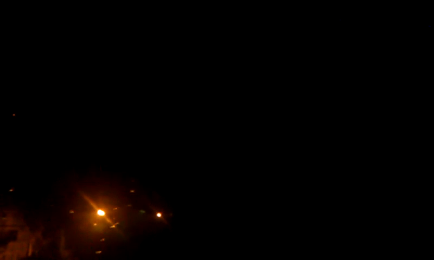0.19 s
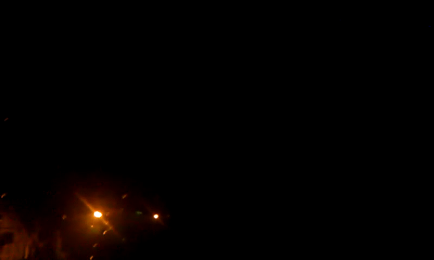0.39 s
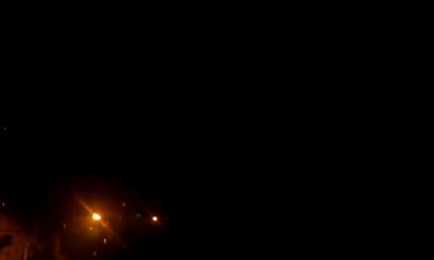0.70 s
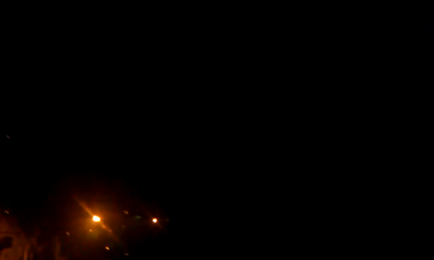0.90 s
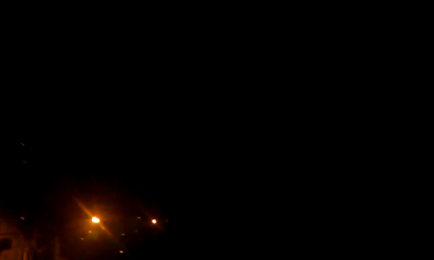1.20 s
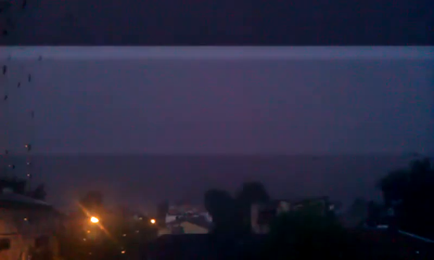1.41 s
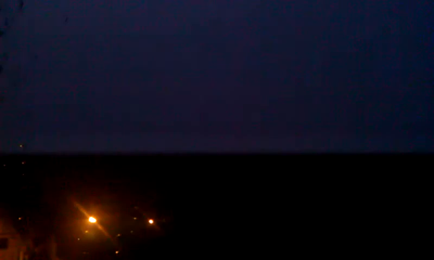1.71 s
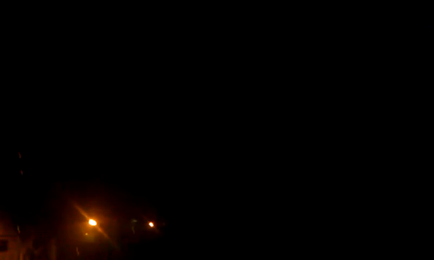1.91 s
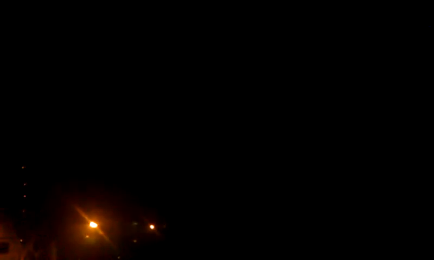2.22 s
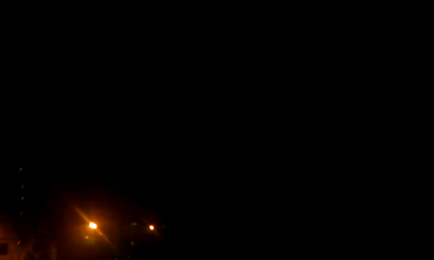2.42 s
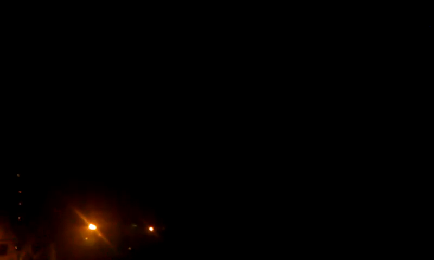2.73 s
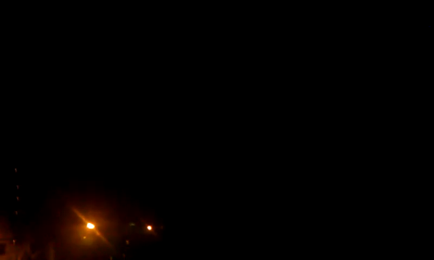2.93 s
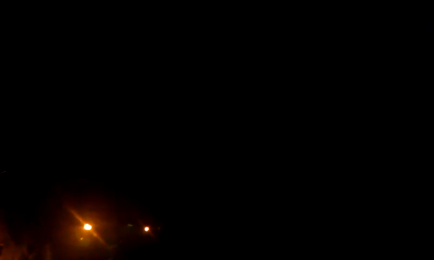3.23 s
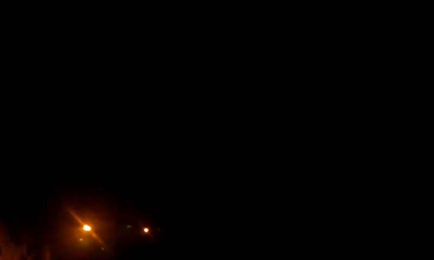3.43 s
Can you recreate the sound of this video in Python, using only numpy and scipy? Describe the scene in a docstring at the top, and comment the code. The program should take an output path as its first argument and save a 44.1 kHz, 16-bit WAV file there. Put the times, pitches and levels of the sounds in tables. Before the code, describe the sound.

Thunder right overhead rips and slams, overloading a simple microphone, strikes again, then fades in lumpy rolls. Soft rain hisses behind it, with a near cricket chirping over a faint far trill, outdoors at night.

```python
"""Close thunder booms at once and rolls on over a wet town at night, heard from a balcony.
The roll is a dense train of random clicks (small shock fronts) that ring the balcony's low resonances.
Short swelling tones add single booms; brief rings with spits of noise add cracks that overload the microphone.
Steady rain, made of clicks and noise, hisses behind it. High up, gliding tones chirp like a near cricket
over a fuzzy trill of farther ones."""
import sys
import numpy as np
from scipy import signal
from scipy.io import wavfile
from scipy.ndimage import uniform_filter1d

SR = 44100
rng = np.random.default_rng(int(sys.argv[2]) if len(sys.argv) > 2 else 0)


def generate_wav(sig):
    """Save sig (samples, or channels by samples) to the path in sys.argv[1] as 16-bit PCM at SR."""
    pcm = np.round(np.clip(np.atleast_2d(sig).T, -1, 1) * 32767).astype(np.int16)
    wavfile.write(sys.argv[1], SR, pcm)


N = 158760  # length in samples: 3.6 s


def amp(db):
    """Turn decibels into a plain multiplier."""
    return 10 ** (np.asarray(db) / 20)


def evened(x):
    """Scale a sound to an average (RMS) strength of 1."""
    return x / np.sqrt(np.mean(x ** 2) + 1e-20)


def curve(rows, axis):
    """Draw one column of a time table as straight lines, with a value at every sample."""
    rows = np.array(rows)
    return np.interp(np.arange(N) / SR, rows[:, 0], rows[:, axis])


def colour(x, points):
    """Filter a sound to follow a spectrum table, with the least possible delay (minimum phase)."""
    point_hz, point_db = np.transpose(points)
    hz = np.abs(np.fft.fftfreq(8192, 1 / SR))
    gain_db = np.interp(np.log(hz + 1), np.log(point_hz + 1), point_db)
    log_gain = gain_db * np.log(10) / 20
    # the Hilbert transform finds the phase that belongs to this gain
    response = np.exp(np.conj(signal.hilbert(log_gain)))
    taps = np.fft.ifft(response).real[:4096]
    return signal.oaconvolve(x, taps)[:N]


def resonate(x, hz, width_hz):
    """Ring at one pitch, with gain 1 there; a narrower resonance rings longer."""
    return signal.lfilter(*signal.iirpeak(hz, hz / width_hz, SR), x)


def clicks(per_s, spread_db):
    """Scatter random clicks that push either way; a few are large."""
    chance = rng.random(N)
    sign = rng.choice([-1., 1.], N)
    size = np.minimum(rng.exponential(1, N), 5)
    return (chance < per_s / SR) * sign * amp(spread_db * size)


def add(mix, start_s, sound):
    """Add a short sound into the mix, cut off at the end of the scene."""
    part = mix[round(start_s * SR):][:len(sound)]
    part += sound[:len(part)]


def roll():
    """Thunder arrives as many small shock fronts, in five layers; all but the top one ring the balcony."""
    # level of the four ringing layers over time: time_s, deep_db, bass_db, body_db, upper_db
    layer_levels = [(0.0, -33.5, -25, -35.5, -23.5), (0.06, -21, -38, -27, -22),
                    (0.11, -33.5, -26, -28.5, -23.5), (0.15, -28, -24, -20, -20),
                    (0.18, -18, -15, -21, -19), (0.205, -19, -10.5, -13.5, -12.5),
                    (0.228, -19, -14.5, -20.5, -16.5), (0.26, -19, -4.5, -10, -11.5),
                    (0.29, -21, -18, -18, -18.5), (0.32, -20, -19.5, -18.5, -17.5),
                    (0.35, -21, -11.5, -17.5, -17), (0.43, -24, -26.5, -23.5, -22.5),
                    (0.51, -29, -16.5, -17.5, -21.5), (0.55, -31, -16.5, -27.5, -22.5),
                    (0.59, -38, -22, -19, -20), (0.63, -27.5, -27.5, -22, -23),
                    (0.68, -27, -23, -25.5, -25), (0.73, -45, -24.5, -21.5, -21),
                    (0.76, -23, -18, -23.5, -24), (0.82, -20, -27, -17.5, -23),
                    (0.85, -25, -15.5, -13.5, -20.5), (0.88, -24, -17, -21, -19.5),
                    (0.91, -22, -13.5, -22, -23), (0.94, -30, -14, -19.5, -21),
                    (0.97, -38, -17.5, -20.5, -24.5), (1.04, -24.5, -23.5, -22, -26),
                    (1.07, -40, -23.5, -19.5, -25.5), (1.16, -37.5, -33.5, -30.5, -30),
                    (1.26, -52, -34, -37.5, -36), (1.29, -33, -30, -28, -29), (1.32, -33, -33, -30, -32),
                    (1.35, -33, -23, -28, -25.5), (1.39, -32, -24, -27.5, -33),
                    (1.47, -35, -33, -34, -33.5), (1.56, -37, -31.5, -32, -34), (1.6, -37, -27, -27.5, -33),
                    (1.65, -32, -38, -28, -31.5), (1.7, -35, -30.5, -27, -31.5),
                    (1.76, -30, -33, -25.5, -33.5), (1.78, -35, -38, -31, -32),
                    (1.815, -40, -33, -29, -33.5), (1.83, -41, -31, -22.5, -29.5),
                    (1.87, -34, -34, -32, -35), (1.93, -38, -47, -34.5, -36.5),
                    (1.98, -53, -31, -34.5, -37), (2.01, -31, -32, -35, -34.5),
                    (2.15, -45, -32.5, -38, -37.5), (2.19, -33, -46, -32.5, -38),
                    (2.28, -50, -35, -39.5, -39), (2.33, -46, -35, -36, -41), (2.35, -39, -34, -30, -33),
                    (2.41, -41, -32, -35, -36.5), (2.47, -46, -39, -30.5, -36.5),
                    (2.49, -28.5, -33, -27.5, -34.5), (2.52, -39, -34, -33, -34.5),
                    (2.55, -31, -32, -27.5, -35.5), (2.65, -46, -32.5, -29.5, -38),
                    (2.67, -42, -43, -37, -41), (2.76, -52, -39, -37.5, -40.5),
                    (2.83, -48, -43, -37, -41.5), (2.87, -46, -42, -41, -38), (2.94, -45, -46, -36, -40.5),
                    (3.01, -46, -46, -38.5, -41.5), (3.07, -64, -47, -37, -42),
                    (3.1, -47, -34.5, -34, -38.5), (3.18, -45, -36, -33.5, -41),
                    (3.26, -52, -45, -40.5, -45.5), (3.34, -46, -41, -42.5, -47.5),
                    (3.38, -44, -43, -44, -41), (3.45, -51, -44, -42, -42), (3.6, -43, -45.5, -38, -49.5)]
    # level of the top layer, the sizzle of the nearest fronts: time_s, level_db
    sizzle_level = [(0, -40.5), (.03, -37), (.16, -37.5), (.19, -24), (.22, -30), (.25, -28), (.31, -30.5),
                    (.36, -30), (.45, -37.5), (.65, -40.5), (.82, -38), (.86, -33.5), (.97, -39),
                    (1.15, -48.5), (1.26, -51), (1.3, -46), (1.5, -51.5), (2.5, -56), (3.6, -56)]
    # spectrum of each layer, from deep to sizzle: pitch_hz, gain_db
    deep = [(20, -37), (45, -14), (75, -8.5), (100, -5.5), (120, -12), (150, -23), (16000, -90.5)]
    bass = [(20, -84.5), (95, -32.5), (130, -2.5), (200, -0.5), (250, -10), (320, -42), (16000, -90.5)]
    body = [(20, -55.5), (190, -12.5), (260, 2), (380, 3.5), (560, -1), (750, -23), (16000, -113)]
    upper = [(20, -71.5), (450, -28.5), (620, -0.5), (1000, -2.5), (1700, -7), (2500, -17), (3200, -30.5),
             (16000, -118.5)]
    sizzle = [(20, -61), (1900, -40), (2600, 6.5), (3800, 0.5), (5500, -2), (7000, -11), (8800, -34),
              (9800, -50.5), (16000, -84)]
    # balcony resonances: pitch_hz, width_hz, level_db over the direct sound
    balcony = [(91.5, 11, 9), (154.7, 9.7, 11), (216, 5.8, 10), (294.4, 43, 4), (364.7, 53, -3),
               (429, 11, -10.5), (561, 19.3, 3), (618.4, 11, -1.5), (754.4, 5.4, -3), (802.3, 11, 4.5),
               (889, 7.7, 1), (1021, 21, -3.5), (1510, 8.1, -11.5), (1697, 28, -7.5), (2078, 22, 0.5)]
    # shock fronts per second, one value for each of the five layers
    fronts_per_s = (400, 600, 1200, 3000, 5000)
    # spread in size of the fronts [dB], one value for each of the five layers
    spread_db = (1.2, 1.2, 2.0, 2.4, 1.8)

    out = np.zeros(N)
    for k, spectrum in enumerate((deep, bass, body, upper)):
        direct = colour(clicks(fronts_per_s[k], spread_db[k]), spectrum)
        ringing = sum(amp(db) * resonate(direct, hz, width) for hz, width, db in balcony)
        out += amp(curve(layer_levels, axis=k + 1)) * evened(direct + ringing)
    top = colour(clicks(fronts_per_s[4], spread_db[4]), sizzle)
    return out + amp(curve(sizzle_level, axis=1)) * evened(top)


def booms():
    """A single boom is a few cycles of one tone that swell and fade under a soft hump."""
    # single booms: start_s, level_db, pitch_hz, length_cycles
    boom_list = [(0.146, -7, 147, 2.2), (.177, -4.5, 680, 3.6), (.188, -3.5, 763, 11), (.2, -6.5, 720, 6),
                 (.243, -10, 202, 5.6), (.268, -12.5, 92, 5.2), (.333, -11.5, 154, 6.1),
                 (.765, -10.5, 297, 2.5), (.843, -8, 216, 2.4), (.907, -4.5, 286, 4.7),
                 (.93, -11.5, 153, 5.8), (1.287, -16.5, 228, 4.8), (1.336, -13.5, 230, 5.6),
                 (1.6, -16, 353, 7.5), (1.72, -18.5, 346, 7.7), (1.683, -16, 297, 4.2),
                 (1.822, -21, 347, 5.2), (1.825, -23, 785, 4.1), (2.05, -21, 356, 9),
                 (2.344, -24, 255, 7.8), (2.398, -20, 245, 2.5), (2.409, -13.5, 267, 3.6),
                 (2.483, -17, 325, 5.2), (2.547, -27, 344, 4.6), (2.641, -23, 322, 3.6),
                 (2.87, -34, 910, 5), (3.098, -21.5, 167, 2.3), (3.37, -33, 1030, 7.8)]
    out = np.zeros(N)
    for start_s, db, hz, cycles in boom_list:
        progress = np.arange(0, 1, hz / (cycles * SR))  # 0 to 1 through the boom
        hump = np.sin(np.pi * progress ** 0.68) ** 2  # the power puts the top before the middle
        tone = np.sin(2 * np.pi * cycles * progress)
        add(out, start_s, amp(db) * hump * tone)
    return out


def cracks():
    """A sharp crack is a very short ring, with a spit of noise that fades more slowly."""
    # sharp cracks: start_s, ring_level_db, ring_pitch_hz, spit_db, spit_treble_db
    # (both spit levels are before the noise is coloured)
    crack_list = [(.1165, -9, 1300, -15, -60), (.121, -11, 1300, -22, -70), (.18, -10, 4500, -13, -42),
                  (.187, -20, 5000, -18, -40), (.195, -20, 4500, -19, -40), (.2045, -14, 5100, -20, -42),
                  (.213, -18, 4000, -20, -44), (.2285, -20, 4000, -20, -44), (.2352, 0, 4700, -22, -36),
                  (.2453, 4, 4900, -22, -22), (.2508, 4, 5000, -7, -13), (.2535, -6, 4500, -14, -24),
                  (.2572, -6, 5230, -12, -24), (.266, -18, 5000, -16, -30), (.276, -18, 5600, -20, -40),
                  (.285, -16, 5500, -18, -40), (.292, -17, 5800, -22, -44), (.298, -16, 5300, -20, -44),
                  (.31, -20, 5000, -20, -48), (.34, -18, 2500, -18, -50), (.525, -28, 4000, -25, -70),
                  (.576, -23, 3500, -17, -56), (.725, -28, 3000, -23, -70), (.767, -21, 3000, -17, -60),
                  (.8275, -22, 5500, -24, -42), (.833, -8, 2900, -24, -44), (.8336, -13, 5600, -40, -60),
                  (.8361, 1, 1400, -18, -40), (.8374, -5, 6000, -19, -30), (.8398, -3, 5100, -19, -42),
                  (.8455, -12, 4300, -21, -40), (.85, -19, 5500, -26, -44), (1.01, -30, 3000, -27, -70),
                  (1.2862, -14, 1300, -28, -70), (1.8225, -14, 1000, -34, -70)]
    # spectrum of the spit: pitch_hz, gain_db
    spit_spectrum = [(20, -48.5), (800, 9.5), (2500, -4), (5500, -3.5), (7000, -13.5), (8500, -42),
                     (16000, -65)]
    # spectrum of the spit's treble: pitch_hz, gain_db
    treble_spectrum = [(20, -71), (5500, -25.5), (7500, 0), (11500, -11), (13000, -22), (16000, -32)]
    ring_cycles, spit_t60_s = 15, .05  # cycles, and seconds, for a fall of 60 dB

    rings, spits, trebles = np.zeros(N), np.zeros(N), np.zeros(N)
    t = np.arange(0, .04, 1 / SR)
    spit_rise = np.minimum(t / .001, 1)  # 1 ms
    for start_s, db, hz, spit_db, treble_db in crack_list:
        ring_rise = np.sin(np.pi / 2 * np.minimum(t * hz / 1.5, 1)) ** 2  # over 1.5 cycles
        fade = amp(db - 60 * t * hz / ring_cycles)
        add(rings, start_s, np.sin(2 * np.pi * hz * t) * fade * ring_rise)
        add(spits, start_s, spit_rise * amp(spit_db - 60 * t / spit_t60_s))
        add(trebles, start_s, spit_rise * amp(treble_db - 60 * t / spit_t60_s))
    noise = rng.standard_normal(N)
    return rings + colour(spits * noise, spit_spectrum) + colour(trebles * noise, treble_spectrum)


def cricket():
    """A near cricket's chirps start high, drop in pitch and fade, over the fuzzy trill of farther ones."""
    return near_chirps() + far_trill()


def near_chirps():
    """Each chirp is a wavering tone with a side tone above it; the pair beats roughly."""
    # chirps of the near cricket: start_s, level_db before the rise and fade
    chirp_list = [(0.682, -37.5), (.76, -45), (1.205, -38), (1.371, -42), (1.48, -43), (1.575, -40),
                  (1.685, -37), (1.761, -41), (1.935, -41), (2.025, -41), (2.105, -43), (2.19, -44),
                  (2.275, -42), (2.425, -42), (2.515, -43), (2.6, -38), (2.685, -40), (2.755, -39),
                  (2.84, -41), (2.925, -45), (3.11, -38.5), (3.196, -41), (3.275, -38), (3.355, -35),
                  (3.44, -39), (3.525, -37.5)]
    chirp_hz, drop_hz, drop_s = 5355, 120, .014  # resting pitch, extra pitch at the start, its decay time
    waver_hz = 65  # RMS
    side_hz, side_db = 180, -5  # distance above the chirp, level against it
    rise_s, t60_s = .012, .2  # rise time, time to fade by 60 dB

    out = np.zeros(N)
    t = np.arange(0, .09, 1 / SR)
    wobble = rng.standard_normal((len(chirp_list), len(t)))
    for (start_s, db), shake in zip(chirp_list, wobble):
        waver = waver_hz * evened(uniform_filter1d(shake, size=200))
        hz = chirp_hz + drop_hz * np.exp(-t / drop_s) + waver
        turn = 2 * np.pi * np.cumsum(hz) / SR
        side_tone = amp(side_db) * np.sin(turn + 2 * np.pi * side_hz * t)
        envelope = np.minimum(t / rise_s, 1) * amp(db - 60 * t / t60_s)
        add(out, start_s, (np.sin(turn) + side_tone) * envelope)
    return out


def far_trill():
    """Farther crickets blend into one wavering tone plus noise rung in narrow bands."""
    # level of the trill over time: time_s, level_db
    trill_level = [(0, -50), (.6, -48), (.72, -48), (.8, -50), (.9, -47), (.96, -41), (1.08, -40.5),
                   (1.14, -43), (1.16, -51), (1.25, -53), (1.3, -58), (1.6, -55), (1.87, -60), (2.0, -54),
                   (2.38, -60), (2.7, -55), (2.88, -52), (2.99, -50), (3.04, -60), (3.3, -57), (3.6, -53)]
    # bands of the fuzz: pitch_hz, width_hz, level_db against each other
    fuzz_bands = [(5380, 90, 0), (5570, 120, -4)]
    trill_hz, waver_hz, fuzz_db = 5395, 70, -1  # mean pitch, RMS waver, fuzz against the tone

    noise = rng.standard_normal(N)
    # each band is filtered twice, for steeper sides
    fuzz = evened(sum(amp(db) * resonate(resonate(noise, hz, width), hz, width)
                      for hz, width, db in fuzz_bands))
    pitch = trill_hz + waver_hz * evened(uniform_filter1d(rng.standard_normal(N), size=300))
    tone = evened(np.sin(2 * np.pi * np.cumsum(pitch) / SR))
    return amp(curve(trill_level, axis=1)) * evened(tone + amp(fuzz_db) * fuzz)


def rain():
    """Dense far drops are clicks over a noise bed; the part above 8 kHz has its own level."""
    # spectrum of the rain: pitch_hz, gain_db
    rain_spectrum = [(30, -7.5), (150, -4.5), (500, -15), (1100, -12.5), (2300, -25), (3500, -27),
                     (5800, -17), (7500, -25.5), (10000, -39.5), (13000, -43.5), (15000, -30.5),
                     (16000, -58)]
    # level of the rain above 8 kHz over time: time_s, level_db
    treble_level = [(0, -102), (1.1, -86.5), (1.2, -68), (1.9, -64), (2.7, -59), (3.6, -57.5)]
    rain_db, drops_per_s, drop_spread_db = -43, 5500, 4

    drops = clicks(drops_per_s, drop_spread_db) + rng.standard_normal(N)
    hiss = evened(colour(drops, rain_spectrum))
    high_pass = signal.firwin(255, 8000, pass_zero=False, fs=SR)
    top = signal.oaconvolve(hiss, high_pass, "same")
    return amp(rain_db) * (hiss - top) + amp(curve(treble_level, axis=1)) * evened(top)


def scene():
    """Add all the sources together, as one channel."""
    return (roll() + booms() + cracks() + rain() + cricket())[None]


def record(dry):
    """The microphone flattens peaks at its limit, with a hard knee; then the highest treble is cut."""
    limit, knee, edge_hz = .73, 8, 15900  # greatest swing, sharpness of the bend, top of the band
    clipped = dry / (1 + abs(dry / limit) ** knee) ** (1 / knee)
    low_pass = signal.firwin(511, edge_hz, window=("kaiser", 9), fs=SR)
    return signal.oaconvolve(clipped, low_pass[None], "same")


dry = scene()
out = record(dry)
generate_wav(out)
```